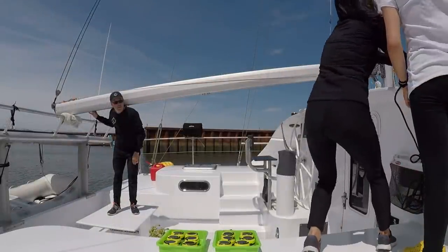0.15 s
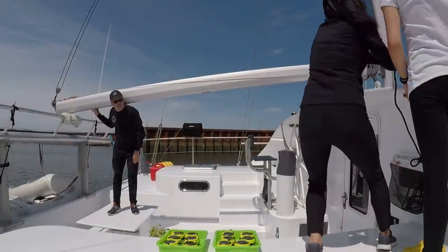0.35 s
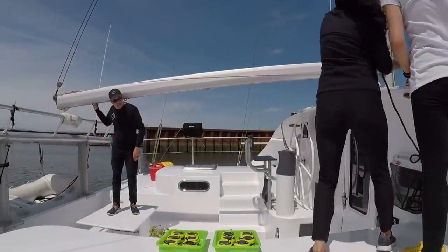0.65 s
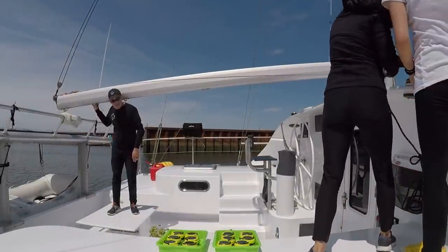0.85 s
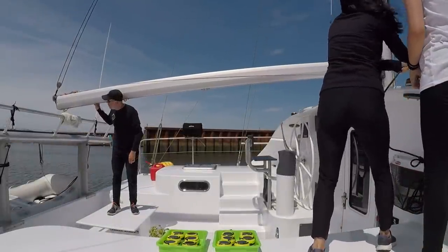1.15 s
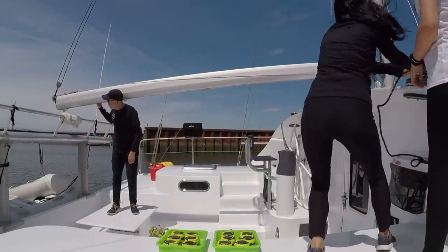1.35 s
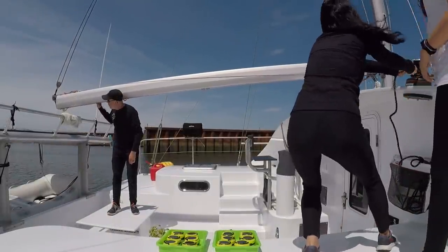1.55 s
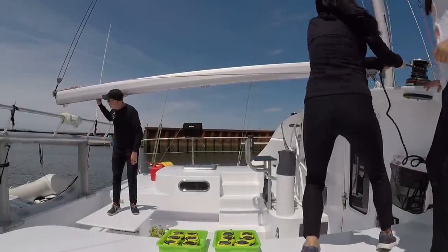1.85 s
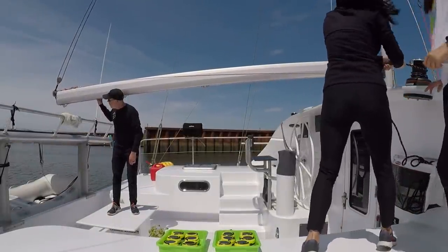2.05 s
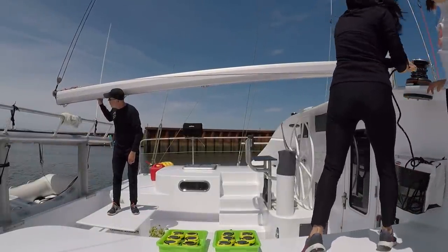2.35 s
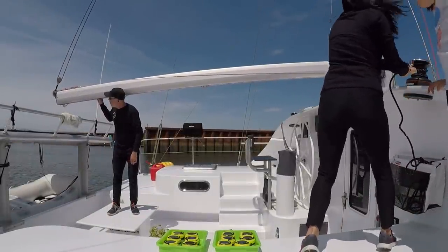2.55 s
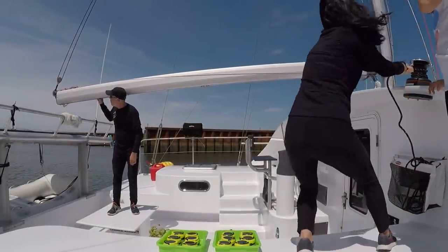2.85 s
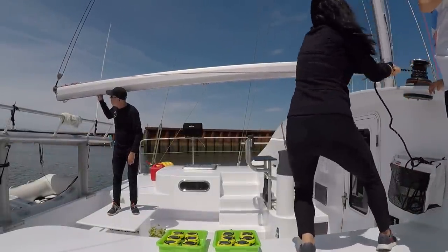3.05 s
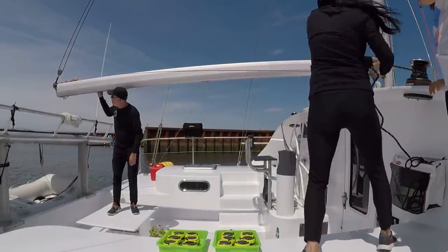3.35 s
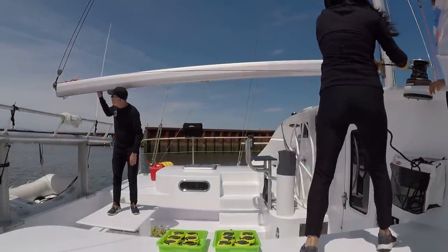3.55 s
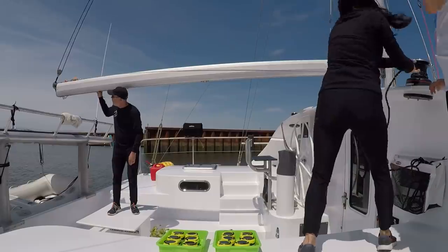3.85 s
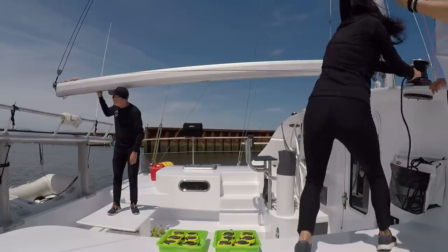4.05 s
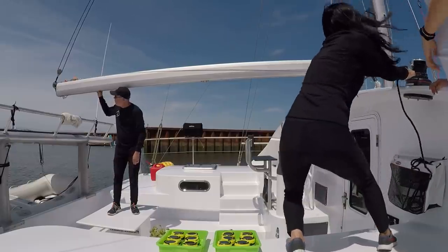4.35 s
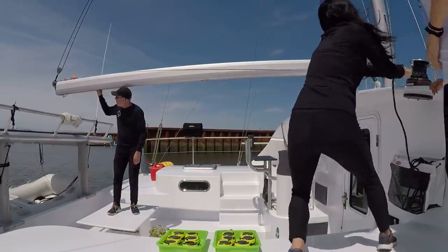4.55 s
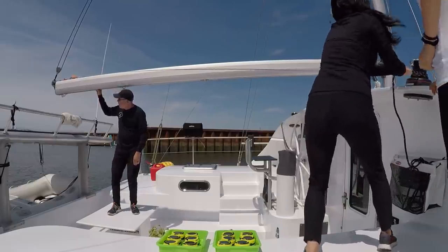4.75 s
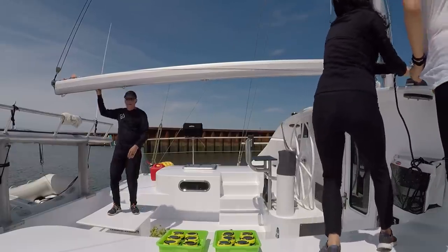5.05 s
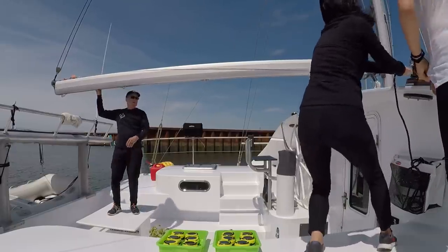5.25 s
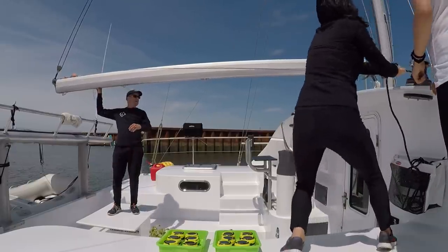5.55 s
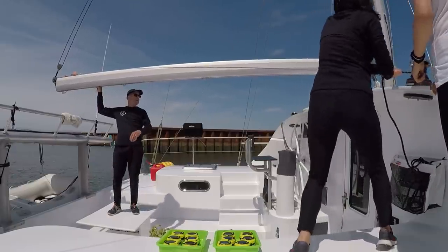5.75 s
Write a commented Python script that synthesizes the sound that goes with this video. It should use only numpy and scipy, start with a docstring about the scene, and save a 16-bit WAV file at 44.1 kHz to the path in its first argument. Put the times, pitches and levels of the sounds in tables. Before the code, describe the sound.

Close on an open boat deck, a winch starts with a fast ratcheting whirr, then pauses. Scattered clicks lead to a second burst with sharp rope snaps, and a third, longest one with metallic clinks and loud snapping. Later come faint shoe scuffs and squeaks, then two short runs of slower clicks, one with a dull knock. Wind rumbles and drones at the microphone over soft water wash; mono, nearly dry.

```python
"""Sailboat winch cranked in bursts

In each long stroke the pawls click faster and faster into a whirr of gears, then slow down again.
Pawls and clinks are noise bursts ringing metal modes; the gears are a rattle of random tooth knocks.
The loaded line snaps, hisses, creaks and squeaks on the drum, and shoes scuff the deck: clicks, grains
and gliding tones. Wind buffets the microphone and drones, over the wash of the harbour: shaped noise."""
import sys
import numpy as np
from scipy import signal
from scipy.fft import rfft, irfft, next_fast_len
from scipy.io import wavfile
from scipy.ndimage import uniform_filter1d

SR = 44100
rng = np.random.default_rng(int(sys.argv[2]) if len(sys.argv) > 2 else 0)


def to_wav(sig):
    """Store sig (one row per channel, or 1-D mono) as 16-bit WAV at the path in sys.argv[1].

    Samples outside -1..1 are clipped; the rate is SR.
    """
    pcm = np.clip(np.atleast_2d(sig), -1, 1) * 32767
    pcm = np.round(pcm).astype(np.int16)
    wavfile.write(sys.argv[1], SR, pcm.T)  # frames by channels


N = 260125
T = np.arange(N) / SR

# pawl clicks heard one by one, slow or in short quick strokes: (time [s], relative level [dB])
PAWL_CLICKS = [(0.0679, -32.5), (0.1152, -36), (0.142, -37.5), (1.0221, -43), (1.06, -43.5), (1.082, -52),
               (1.0989, -47), (1.2675, -38), (1.2935, -37.5), (1.3137, -50), (1.3394, -42), (1.36, -37.5),
               (1.3884, -40), (1.4321, -36), (1.4611, -35), (1.481, -38), (1.491, -40), (1.5209, -35.5),
               (1.5486, -31.5), (1.5788, -37), (1.595, -44), (1.6055, -39.5), (1.625, -39.5), (1.8621, -35),
               (1.8873, -40.5), (1.9325, -42), (2.7895, -36), (3.1736, -30), (3.214, -32.5),
               (4.2266, -32.5), (4.2706, -32), (4.3233, -34), (4.3395, -34), (4.375, -31.5), (4.422, -33),
               (4.4315, -38), (4.4437, -30.5), (4.458, -39.5), (4.4674, -35.5), (4.4755, -47),
               (4.4916, -31), (4.5158, -41), (4.528, -33.5), (5.314, -32.5), (5.3773, -31), (5.4201, -33.5),
               (5.451, -31), (5.4771, -33.5), (5.4984, -29), (5.5177, -34.5), (5.5345, -32.5),
               (5.5523, -34), (5.5707, -34.5), (5.5907, -34.5), (5.614, -33.5), (5.657, -35)]
# a push on the handle gathers speed, tops out and slows: (start [s], fastest [s], end [s],
# first, top and last rate [clicks/s], pawl level [dB], gear level at the ends [dB], at the top [dB])
STROKES = [(0.166, 0.232, 0.28, 49.8, 55.9, 51.9, -35.5, -47.5, -37.5),
           (0.263, 0.45, .55, 56.2, 72, 40.2, -35, -43, -34.5),
           (1.6245, 1.779, 1.85, 60.4, 65.66, 40, -33.5, -48.5, -39),
           (2.792, 3.086, 3.198, 51.97, 82.05, 39.7, -33.5, -48.5, -35.5)]
# the line slides over the drum, catching as it goes:
# (start [s], end [s], hiss level [dB], catches [1/s], snap level [dB]), levels relative
SLIDES = [(0.266, 0.522, -53, 150, -49), (1.1, 1.202, -61.5, 17, -42), (1.33, 1.49, -57, 20, -56),
          (1.488, 1.699, -51, 35, -46), (1.723, 1.83, -50, 44, -46), (1.865, 1.995, -58, 18, -54),
          (2.775, 2.927, -47, 25, -36), (2.938, 3.135, -46, 124, -24.5), (3.38, 3.586, -54.5, 20, -52),
          (4.09, 4.18, -58.5, 18, -54), (4.235, 4.337, -56, 22, -54), (4.45, 4.675, -53.5, 29, -56),
          (4.757, 4.876, -60, 18, -53), (5.087, 5.21, -60, 10.2, -52), (5.493, 5.766, -55, 18, -55)]
# relative spectrum of a pawl blow: (frequency [Hz], level [dB])
PAWL_COLOUR = [(200, -46), (500, -1.5), (1200, 1.5), (1800, -1.5), (2800, 1), (3600, 0), (5500, -4),
               (8000, -8), (9500, -10.5), (11000, -17), (13500, -13), (15500, -24)]
# relative spectrum of a snap of the line: (frequency [Hz], level [dB])
SNAP_COLOUR = [(500, -35), (2000, -3), (3600, -2), (5500, 3), (7000, 3), (8700, 0), (11000, -10),
               (14000, -10.5), (16000, -21)]


def ratchet(chatter_s=0.0057, landing_s=0.00041, pawl_db=-6, ring_db=-8.5, uneven_db=3.0,
            rebound=0.12, rebound_s=0.014):
    """Each pawl lands, chatters for a few milliseconds and rebounds once, ringing the winch."""
    t = np.arange(SR // 30) / SR
    blows = np.zeros(N)
    modes = winch_modes()
    drop = np.exp(-t / chatter_s) * (1 - np.exp(-t / landing_s))
    for s, db in list(PAWL_CLICKS) + tooth_clicks():
        late = t - rebound_s * (.5 + rng.random())
        shape = drop + rebound * (late > 0) * np.exp(-abs(late) / chatter_s)
        bounces = amp(uneven_db * unit(uniform_filter1d(rng.standard_normal(len(t)), size=45)))
        chatter = shape * bounces * rng.standard_normal(len(t))
        chatter *= amp(db + pawl_db) * np.linalg.norm(shape) / np.linalg.norm(chatter)
        add(blows, s, chatter)
        ring = signal.fftconvolve(chatter, body(modes))
        add(blows, s, amp(ring_db) * ring * np.linalg.norm(chatter) / np.linalg.norm(ring))
    click = impulse(PAWL_COLOUR)
    coloured = signal.oaconvolve(blows, click / np.linalg.norm(click))[:N]
    return deck(coloured, wet_db=-12, t60=.1)


def tooth_clicks(scatter_db=1.0, skim_db=-1):
    """One click (s, dB) for each tooth that passes under the pawl; speed follows effort."""
    clicks = []
    for start, fastest, end, first, top, last, db, *_ in STROKES:
        t = np.arange(start, end, 1 / SR)
        slow = np.where(t < fastest, first, last)
        rate = slow + (top - slow) * effort(t, start, fastest, end)
        teeth = np.cumsum(rate) / SR
        at = t[np.diff(np.floor(teeth), prepend=-1) > 0]
        # at full speed the pawl has less time to drop and lands more softly
        skim = skim_db * effort(at, start, fastest, end)
        scatter = scatter_db * rng.standard_normal(size=64)[:len(at)]
        clicks += zip(at, db + skim + scatter)
    return clicks


def effort(t, start, fastest, end):
    """The push on the handle: an arch from 0 up to 1 and back."""
    return np.sin(np.pi * np.interp(t, [start, fastest, end], [0, .5, 1]))


def winch_modes(count=3000):
    """The dying modes of the winch body, one to a row."""
    # ringing of the winch body: (frequency [Hz], relative level [dB], t60 [s])
    modes = [(721, -12, .06), (1168, -13, .05), (1324, -13, .05), (2137, -8, .04), (2930, -4, .035),
             (4130, -7, .035), (4990, -8, .03), (5650, -5, .03), (6300, -6, .04), (7080, 0, .045),
             (7250, -3, .04), (8020, -3, .04), (14450, 4, .04), (14650, 0, .03)]
    t = np.arange(count) / SR
    hz, db, t60 = np.transpose(modes)[:, :, None]
    return amp(db - 60 * t / t60) * np.exp(2j * np.pi * hz * t)


def body(modes):
    """The ring of the winch body: each blow finds the modes with other strengths."""
    a, b = rng.standard_normal((2, len(modes), 1))
    ring = (a * modes.imag + b * modes.real).sum(0)
    return ring / np.linalg.norm(ring)


def gears(whirr_db=-2, knocks_per_s=520, ring_s=0.0021, smooth=0.18, sing_db=-20):
    """Teeth and roller bearings knock at random, hundreds a second, and keep the spinning winch ringing."""
    # relative spectrum of the whirr: (frequency [Hz], level [dB])
    gear_colour = [(160, -20), (280, -8), (411, 0.5), (454, -5.5), (602, -4), (666, -5), (786, -1),
                   (960, -9.5), (1270, -4.5), (1530, -11.5), (2210, -9), (3960, -18.5), (7210, -21),
                   (10200, -38), (15000, -37)]
    hits = 1. * (rng.random(N) < knocks_per_s / SR)
    power = signal.oaconvolve(hits, np.exp(-np.arange(SR // 40) / SR / ring_s))[:N]
    # a constant floor of power fills the gaps between knocks
    rattle = np.sqrt(abs(power / power.mean()) + abs(smooth)) * rng.standard_normal(N)
    whirr = steady(tint(rattle, gear_colour), size=700)
    sing = tint(signal.oaconvolve(rattle, body(winch_modes()))[:N], PAWL_COLOUR)
    return spin() * (amp(whirr_db) * whirr + amp(sing_db) * sing)


def spin(jog_db=-14, jog_s=0.021):
    """Gain of the gears: it swells with the effort of each stroke and jumps at each listed pawl click."""
    gain = np.zeros(N)
    for start, fastest, end, *_, ends_db, top_db in STROKES:
        swell = effort(T, start, fastest, end) ** 2
        level = amp(ends_db + (top_db - ends_db) * swell)
        gain += level * held(start, end, attack_db_per_s=420, release_db_per_s=255)
    # each of these clicks shakes the gears, which rattle on briefly
    jog = np.exp(-np.arange(SR // 8) / SR / jog_s)
    for s, db in PAWL_CLICKS:
        add(gain, s, amp(db + jog_db) * jog)
    return gain


def clinks(clink_db=-2, chatter_s=.0022):
    """A metal part chatters briefly against its seat and rings out on one mode."""
    # metal parts of the winch clink: (time [s], pitch [Hz], relative level [dB], t60 [s])
    parts = [(0.24, 2090, -30, 0.015), (1.481, 2875, -36, .035), (1.539, 7950, -40, 0.035),
             (1.593, 7960, -34, 0.028), (1.606, 7100, -36, .035), (1.689, 7300, -38, .03),
             (1.703, 2210, -28, 0.013), (1.718, 2300, -34, 0.013), (1.890, 7970, -43, 0.05),
             (1.933, 3000, -40.5, 0.018), (2.790, 4110, -30.5, 0.028), (2.796, 4070, -30, .028),
             (2.806, 4190, -33, .024), (2.812, 4030, -27, .025), (2.814, 3150, -37, .025),
             (2.829, 4080, -28, 0.026), (2.842, 2950, -27, 0.018), (2.848, 4070, -32, .025),
             (2.86, 4070, -26, 0.023), (2.874, 4190, -29, .024), (2.883, 4100, -30, 0.018),
             (2.991, 7120, -38, .04), (3.007, 7080, -38, .04), (3.193, 7130, -42, 0.05),
             (3.5838, 3340, -36, 0.0091), (5.380, 2930, -45, 0.15), (5.554, 7150, -40, 0.035)]
    t = np.arange(SR // 10) / SR
    out = np.zeros(N)
    for s, hz, db, t60 in parts:
        mode = amp(db + clink_db - 60 * t / t60) * np.sin(2 * np.pi * hz * t)
        chatter = np.exp(-t / chatter_s) * rng.standard_normal(len(t))
        ring = signal.fftconvolve(chatter, mode)
        add(out, s, ring * np.linalg.norm(mode) / np.linalg.norm(ring))
    return deck(out, wet_db=-20, t60=0.086)


def knock(thud_s=0.0032, rattle=0.044):
    """Dull blows through the well-damped deck: a firm edge and a brief rattle."""
    # the handle knocks as it takes up the load: (time [s], pitch [Hz], relative level [dB])
    blows = [(1.971, 635, -34.5), (4.381, 430, -32), (4.387, 257, -27.5)]
    # dull response of the deck: (multiple of the knock's pitch [1], relative level [dB])
    deck_colour = [(.3, -20), (.65, -1), (1, 3), (1.35, -2), (1.8, -10), (2.7, -8), (5, -22), (18, -60)]
    t = np.arange(SR // 20) / SR
    out = np.zeros(N)
    shape = np.exp(-t / thud_s)
    for s, hz, db in blows:
        boom = impulse([(hz * multiple, level) for multiple, level in deck_colour])
        blow = (t == 0) + rattle * shape * rng.standard_normal(len(t))
        thud = np.convolve(blow, boom)
        add(out, s, amp(db) * thud * np.linalg.norm(shape) / np.linalg.norm(thud))
    return out


def snaps(snap_db=5, crumble=0.11, crumble_s=0.0015):
    """Stick and slip of the taut line: one sharp edge, then a crumble of fibres."""
    # the line lets go with one hard snap: (time [s], relative level [dB])
    single_snaps = [(.747, -41), (1.7235, -19), (1.7404, -18), (1.7518, -17), (1.7682, -15),
                    (1.7785, -21.5), (1.7876, -20), (1.7968, -16), (1.8098, -20), (1.8188, -16),
                    (1.827, -20), (1.833, -18), (1.951, -44), (1.978, -44), (2.7315, -41), (2.7502, -25.5),
                    (2.767, -29), (2.8298, -23), (2.846, -19), (2.871, -23), (2.884, -21), (2.892, -21),
                    (2.904, -31), (2.9148, -20), (2.9256, -22), (2.9457, -21.5), (3.041, -26),
                    (3.0545, -19), (3.078, -21), (3.099, -21), (3.1383, -21), (3.1589, -16.5), (3.171, -28),
                    (3.355, -38), (3.362, -42), (3.4116, -38), (3.462, -37), (3.494, -38), (3.508, -45),
                    (3.533, -39), (3.554, -42), (3.5845, -32), (4.034, -36), (4.173, -43), (4.217, -34),
                    (4.751, -37), (5.764, -43), (5.771, -36), (5.784, -42), (5.793, -42), (5.883, -32.5)]
    t = np.arange(SR // 100) / SR
    out = np.zeros(N)
    click = impulse(SNAP_COLOUR)
    for s, db in list(single_snaps) + catches():
        fibres = crumble * np.exp(-t / crumble_s) * rng.standard_normal(len(t))
        snap = np.convolve((t == 0) + fibres, click)
        add(out, s, amp(db + snap_db) * snap / np.linalg.norm(snap))
    return deck(out, wet_db=-10.5, t60=0.017)


def catches(spread=.15, scatter_db=1.2):
    """Snaps (s, dB) at uneven intervals for as long as the line slides."""
    found = []
    for start, end, hiss_db, per_s, db in SLIDES:
        wait, strength = rng.standard_normal(size=(2, 96))
        gaps = np.exp(spread * wait) / per_s
        at = start + np.cumsum(gaps) - gaps[0]
        found += zip(at[at < end], db + scatter_db * strength)
    return found


def sliding(hiss_db=-2, crackle_db=-10, ticks_per_s=350, tick_s=0.00036):
    """The braid hisses and crackles as it slides: dense grains under sparse decaying ticks."""
    # relative spectrum of the hiss: (frequency [Hz], level [dB])
    slide_colour = [(400, 1), (1200, -0.5), (2800, 1.5), (5000, -3.5), (7000, -10), (8500, -12),
                    (11000, -15), (15000, -19)]
    hiss = tint(grains(per_s=14000, spread_db=-5.5), slide_colour)
    decay = np.exp(-np.arange(SR // 200) / SR / tick_s)
    power = signal.oaconvolve(grains(ticks_per_s, spread_db=3.5) ** 2, decay)[:N]
    crackle = tint(np.sqrt(abs(power)) * rng.standard_normal(N), SNAP_COLOUR)
    braid = amp(hiss_db) * hiss + amp(crackle_db) * crackle
    return rubbed(SLIDES) * deck(braid, wet_db=-6.5, t60=0.031)


def creaks(creak_db=0):
    """The turns of line bite on the drum with a dry, nasal rasp."""
    # the line creaks as the load comes on: (start [s], end [s], relative level [dB])
    bites = [(.41, .48, -51.5), (1.7, 1.81, -53), (4.445, 4.475, -53.5), (4.495, 4.512, -50.5)]
    # (frequency [Hz], relative level [dB])
    colour = [(1000, -19), (1500, -2), (2100, 4), (3100, 2), (3900, -21), (6500, -27)]
    rasp = steady(tint(grains(per_s=2300, spread_db=0.5), colour), size=900)
    return amp(creak_db) * rubbed(bites) * rasp


def squeaks():
    """Fast slips give short gliding tones with overtones, smeared where the slips are uneven."""
    # line and soles squeak: (start [s], length [s], start, middle and end pitch [Hz],
    # relative level [dB], loss per overtone [dB], roughness [0-1])
    slips = [(1.525, .042, 4350, 4750, 5050, -47, 24, .2), (1.552, .025, 6300, 6550, 6700, -56, 25, .6),
             (1.56, .04, 3900, 4050, 4150, -56.5, 22, .3), (2.045, .05, 2000, 2700, 3900, -60, 12, .6),
             (2.05, .034, 2800, 3550, 4300, -59, 15, .3), (3.815, .04, 3200, 3800, 4900, -54, 12, .3),
             (3.822, .048, 590, 630, 690, -51, 0, .1), (3.855, .06, 1350, 1800, 1500, -53.5, 8, .5),
             (3.87, .035, 3000, 2650, 2300, -55, 7, .3), (3.903, .04, 705, 725, 785, -53.5, 1, .14),
             (3.936, .052, 920, 905, 865, -55, 0, .13), (4.679, .018, 2750, 2450, 2100, -43, 24, .2),
             (5.198, .032, 6200, 5200, 3200, -53, 18, .6)]
    out = np.zeros(N)
    for s, length, start, middle, end, db, slope, rough in slips:
        u = np.linspace(0, 1, int(length * SR))
        smooth_noise = unit(uniform_filter1d(rng.standard_normal((2, SR // 5)), size=30))
        wobble, grip = smooth_noise[:, :len(u)]
        hz = np.interp(u, [0, .5, 1], [start, middle, end]) * (1 + rough * wobble / 10)
        turn = 2 * np.pi * np.cumsum(hz) / SR
        tone = sum(amp(-slope * k) * np.sin(k * turn) * (k * hz < SR / 2) for k in range(1, 7))
        add(out, s, amp(db) * unit(tone * (1 + rough * grip) * np.sin(np.pi * u)))
    return deck(out, wet_db=-10, t60=.06)


def scuffs(scuff_db=-1):
    """Rubber soles drag over the gritty deck."""
    # a shoe scuffs the deck: (start [s], end [s], relative level [dB])
    drags = [(.73, .745, -52.5), (2.05, 2.14, -56.5), (2.45, 2.7, -64.5), (3.69, 3.79, -57.5),
             (3.81, 3.86, -48), (3.9, 3.98, -53), (5.215, 5.225, -57)]
    # (frequency [Hz], relative level [dB])
    colour = [(400, -12), (1000, 1.0), (1700, -1.0), (3000, 0.0), (4300, -3.5), (6000, -8.5),
              (9000, -19.0), (14000, -34)]
    return amp(scuff_db) * rubbed(drags) * tint(grains(per_s=9000, spread_db=3.0), colour)


def wind(heave_db=-14, gust_db=-1, flutter_db=-1, lumps_db=1.8):
    """Eddies at the microphone: slow heave, deep rumble in gusts, lumpy flutter above it, and a drone."""
    # relative spectra of rumble and flutter: (frequency [Hz], level [dB])
    gust_colour = [(1, -7), (3, -2), (5, 0), (8, -3), (11, -5), (14, -10), (20, -13), (26, -16), (33, -19),
                   (41, -27.5), (52, -32.5), (70, -39.5), (150, -60), (2000, -130)]
    flutter_colour = [(35, -23), (60, 3), (80, 1), (120, 0), (150, -4), (250, -12.5), (400, -24.5),
                      (1000, -70), (6000, -100)]
    eddies = tint(rng.standard_normal(N), gust_colour)
    # the heave is the part below about 21 Hz, the rumble the rest
    heave = irfft(rfft(eddies) / (1 + (np.fft.rfftfreq(N, 1 / SR) / 21) ** 10), N)
    rumble = steady(eddies - heave, size=6000)
    lumps = unit(uniform_filter1d(uniform_filter1d(rng.standard_normal(N), size=2000), size=1200))
    flutter = steady(amp(lumps_db * lumps) * tint(rng.standard_normal(N), flutter_colour), size=12000)
    gust_gain, flutter_gain = gusting()
    heave = amp(heave_db) * steady(heave, size=20000)
    rumble = amp(gust_db) * gust_gain * rumble
    flutter = amp(flutter_db) * flutter_gain * flutter
    return heave + rumble + flutter + drone()


def gusting(calm_rumble_db=-38.5, calm_flutter_db=-44.5):
    """Gains of rumble and flutter: each gust is a bell-shaped swell over the steady breeze."""
    # a gust hits the microphone:
    # (time [s], half-width [s], relative rumble level [dB], relative flutter level [dB])
    gusts = [(.2, 0.17, -46, -41.5), (.53, 0.084, -35, -63), (.76, 0.077, -37, -42),
             (1.03, 0.048, -24.5, -40.5), (1.26, 0.055, -28, -43), (1.56, 0.087, -22.5, -44.5),
             (1.85, 0.067, -31, -35), (2.16, 0.072, -25.5, -50), (2.41, 0.086, -18.5, -41.5),
             (2.57, 0.056, -36, -40.5), (2.8, 0.063, -31.5, -44), (2.979, 0.057, -23.5, -36.5),
             (3.68, 0.025, -32, -57), (4.14, 0.045, -22, -53), (4.46, 0.065, -29.5, -46.5),
             (4.85, 0.12, -24.5, -48), (5.17, 0.022, -17.5, -65), (5.39, 0.071, -31, -52.5),
             (5.85, 0.05, -25, -56)]
    rumble, flutter = amp(calm_rumble_db) ** 2, amp(calm_flutter_db) ** 2  # powers add up
    for s, width, rumble_db, flutter_db in gusts:
        bell = np.exp(-np.minimum(((T - s) / width) ** 2, 20))
        rumble = rumble + amp(rumble_db) ** 2 * bell
        flutter = flutter + amp(flutter_db) ** 2 * bell
    return np.sqrt(rumble), np.sqrt(flutter)


def drone(width_hz=55, drone_db=0, mean_hz=176.55, hz_per_db=2.5):
    """Air across the camera housing excites one broad resonance, higher in pitch as it grows louder."""
    # level of the hollow drone of the wind: (time [s], level [dB])
    drone_levels = [(0.06, -46), (0.26, -46), (0.36, -39), (.8, -41.5), (1.04, -43), (1.42, -50),
                    (1.6, -38), (1.77, -47), (2.09, -43), (2.46, -48), (2.52, -38), (2.68, -50),
                    (2.97, -40), (3.5, -57), (4.13, -45), (4.46, -44), (4.75, -56), (4.98, -46),
                    (5.17, -51), (5.3, -45), (5.45, -45), (5.56, -53), (5.84, -49)]
    r = np.exp(-np.pi * width_hz / SR)
    noise = rng.standard_normal(N) + 1j * rng.standard_normal(N)
    band = signal.lfilter([1], np.poly([r, r]), noise)
    db = np.interp(T, *np.transpose(drone_levels))
    hz = mean_hz + hz_per_db * (db - db.mean())
    turn = np.exp(2j * np.pi * np.cumsum(hz) / SR)  # shifts the band up to the drone's pitch
    return amp(drone_db + db) * steady((band * turn).real, size=12000)


def harbour(db=-52, patchy_db=1.5):
    """The wash of air and water around the boat swells gently."""
    # relative spectrum of the wash: (frequency [Hz], level [dB])
    harbour_colour = [(100, -4), (300, -0.5), (450, -2), (750, -4), (1150, -7), (1700, -14), (2500, -19),
                      (4000, -24), (7000, -29), (10000, -29.5), (12000, -32), (15000, -48)]
    swell = unit(uniform_filter1d(uniform_filter1d(rng.standard_normal(N), size=5000), size=3000))
    return amp(db + patchy_db * swell) * tint(rng.standard_normal(N), harbour_colour)


def deck(x, wet_db, t60):
    """Deck, cabin and mast scatter a short tail."""
    t = np.arange(SR // 4) / SR
    sparse = rng.standard_normal(len(t)) * (rng.random(len(t)) < .1)
    taps = sparse * amp(-60 * t / t60) * (t > .002)
    return x + amp(wet_db) * signal.oaconvolve(x, taps / np.linalg.norm(taps))[:N]


def grains(per_s, spread_db):
    """Tiny impacts of random sign and size, at rms 1."""
    size = amp(spread_db * np.minimum(rng.exponential(1, N), 4))
    return unit(rng.standard_normal(N) * size * (rng.random(N) < per_s / SR))


def rubbed(rows):
    """Gain over time of rubs given as (start s, end s, dB, ..): the loudest rub counts."""
    gains = [amp(db) * held(start, end, attack_db_per_s=355, release_db_per_s=225)
             for start, end, db, *_ in rows]
    return np.max(gains, axis=0)


def held(start, end, attack_db_per_s, release_db_per_s):
    """Gain that rises to 1 at the start, holds, and dies away after the end."""
    rise = -abs(attack_db_per_s) * np.maximum(start - T, 0)
    fall = -abs(release_db_per_s) * np.maximum(T - end, 0)
    db = rise + fall
    gain, heard = np.zeros(N), db > -60
    gain[heard] = amp(db[heard])
    return gain


def steady(x, size):
    """Noise with its own slow swells evened out over a window of size samples."""
    return x / np.sqrt(uniform_filter1d(x ** 2, size=size) + 1e-12)


def tint(x, colour):
    """Gives a steady sound its spectrum, at rms 1."""
    size = next_fast_len(N, True)
    spectrum = rfft(x, size) * gain_at(colour, np.fft.rfftfreq(size, 1 / SR))
    return unit(irfft(spectrum, size)[:N])


def impulse(colour, size=2048):
    """The sharpest causal click with this spectrum (minimum phase)."""
    log_gain = np.log(gain_at(colour, abs(np.fft.fftfreq(size, 1 / SR))))
    return np.fft.ifft(np.exp(np.conj(signal.hilbert(log_gain)))).real[:size // 2]


def gain_at(colour, hz):
    """Gain of a spectrum at any frequency, interpolated in dB over log frequency."""
    f, db = np.transpose(colour)
    return amp(np.interp(np.log(hz + 1), np.log(f + 1), db))


def amp(db):
    """Amplitude of a level in dB."""
    return 10 ** (np.asarray(db) / 20)


def unit(x):
    """Scales to rms 1."""
    return x / np.sqrt(np.mean(x ** 2) + 1e-20)


def add(mix, s, sound):
    """Adds a sound into the mix at s seconds, cut off at the end."""
    part = mix[max(round(s * SR), 0):][:len(sound)]
    part += sound[:len(part)]


def scene():
    """Winch, rubbing line and soles, wind and harbour, summed to one channel."""
    winch = ratchet() + gears() + clinks() + knock()
    friction = snaps() + sliding() + creaks() + scuffs() + squeaks()
    return (winch + friction + wind() + harbour())[None]


def record(dry):
    """The band limit of the camera: a steep linear-phase low-pass."""
    edge_hz = 15450
    low_pass = signal.firwin(301, edge_hz, window=("kaiser", 9), fs=SR)
    return signal.oaconvolve(dry, low_pass[None], "same")


dry = scene()
out = record(dry)
to_wav(out)
```